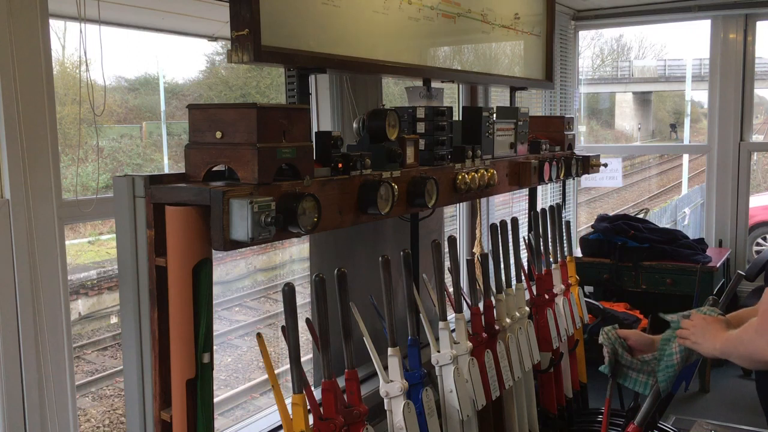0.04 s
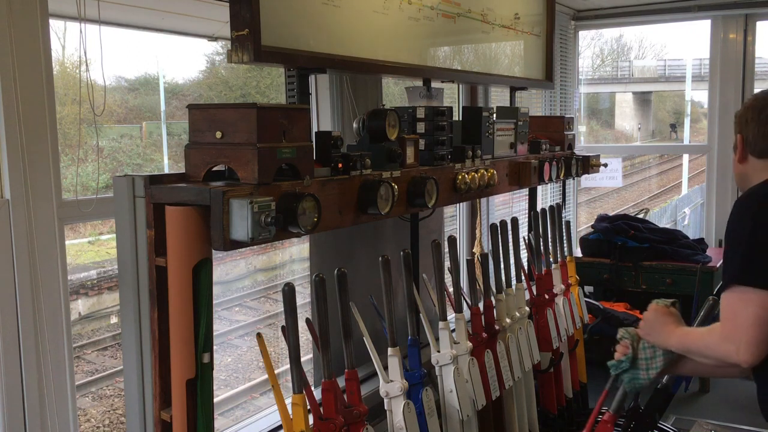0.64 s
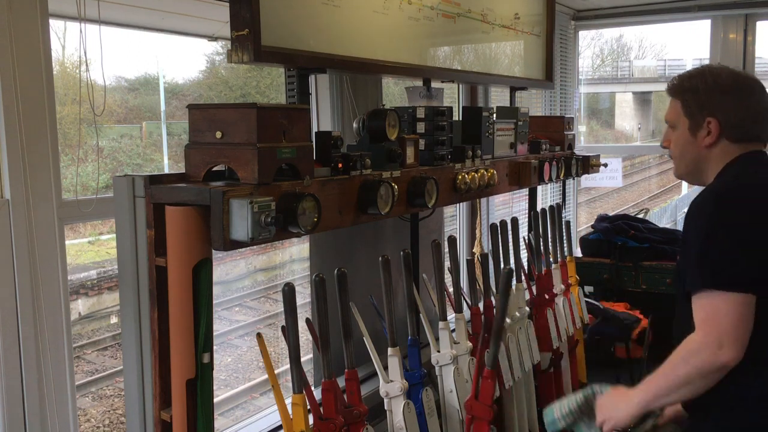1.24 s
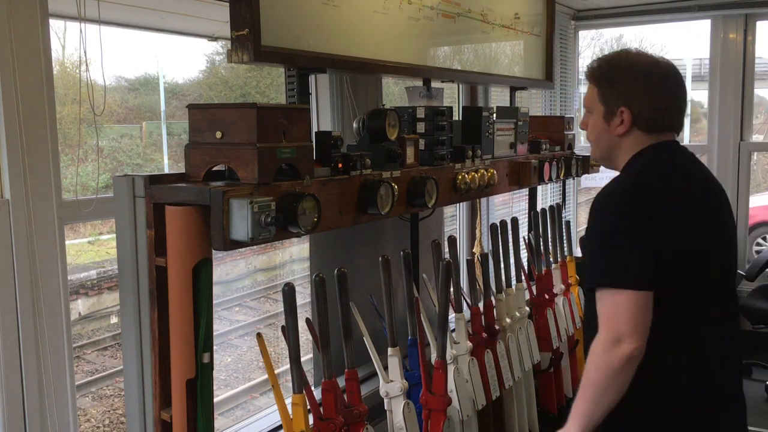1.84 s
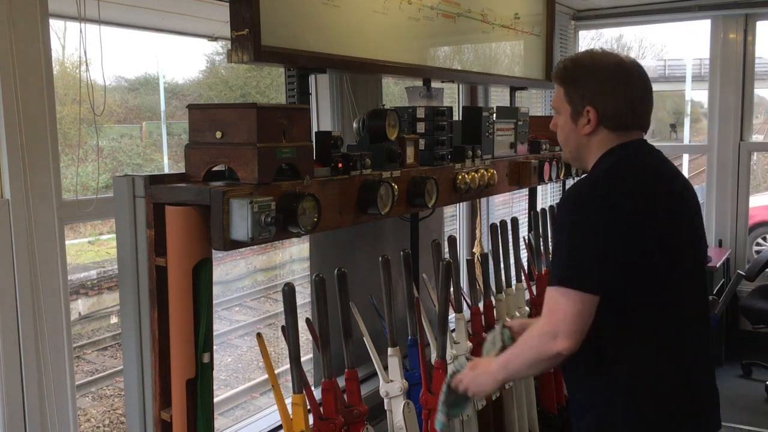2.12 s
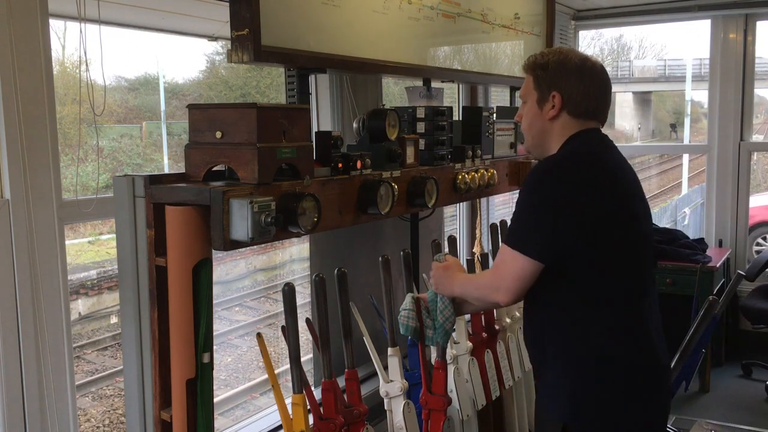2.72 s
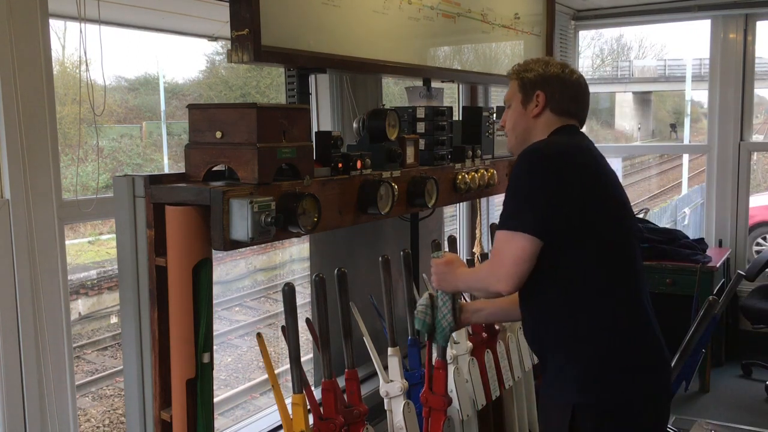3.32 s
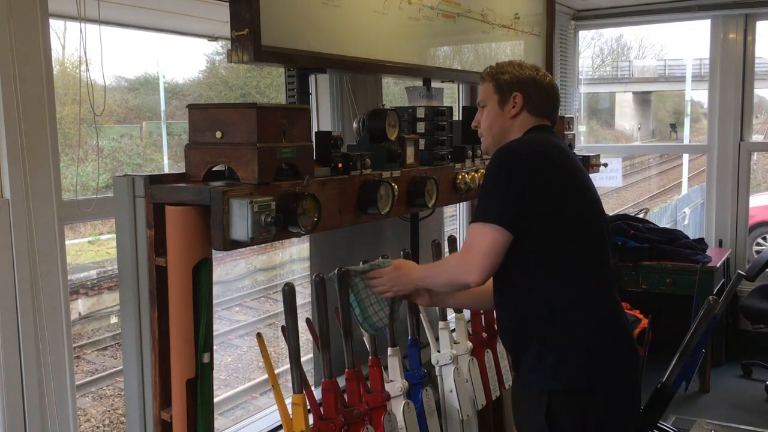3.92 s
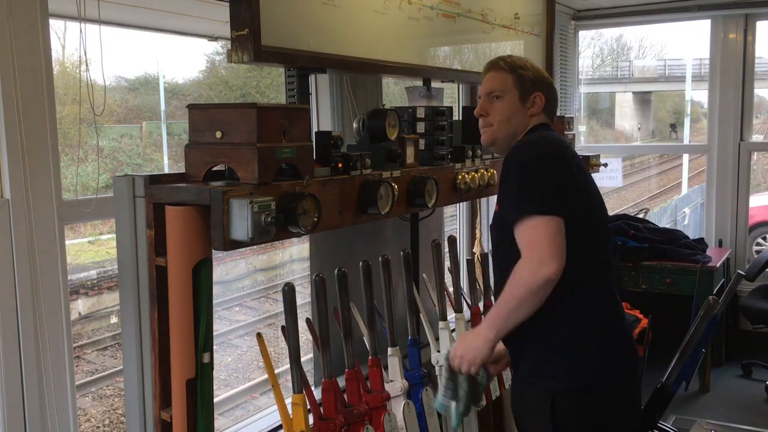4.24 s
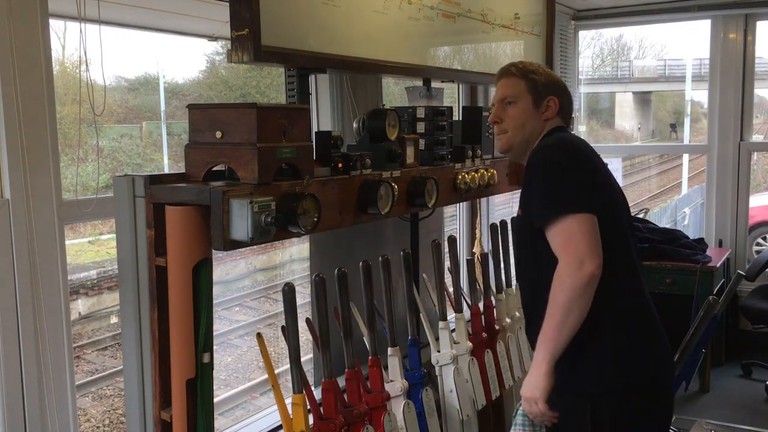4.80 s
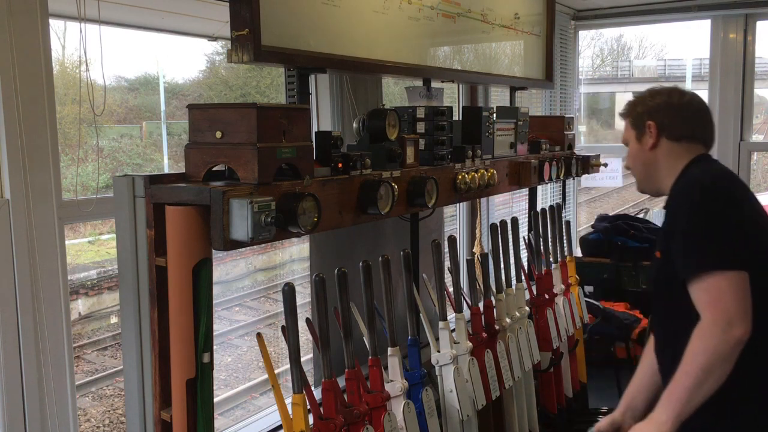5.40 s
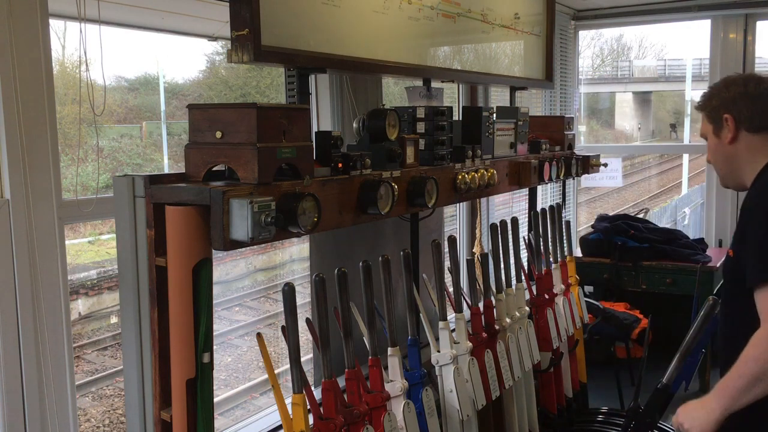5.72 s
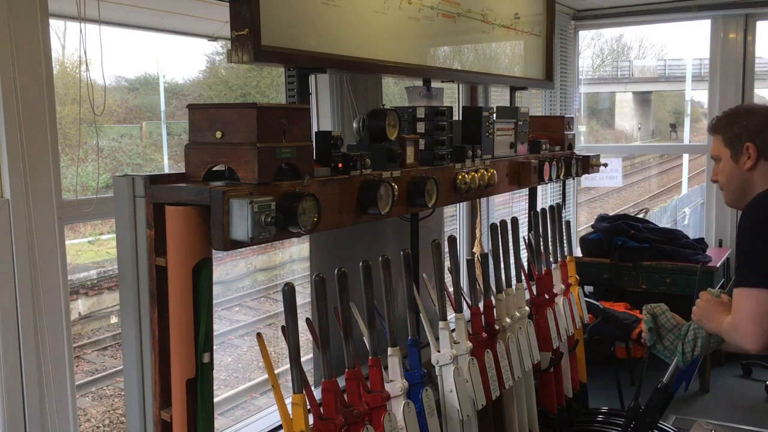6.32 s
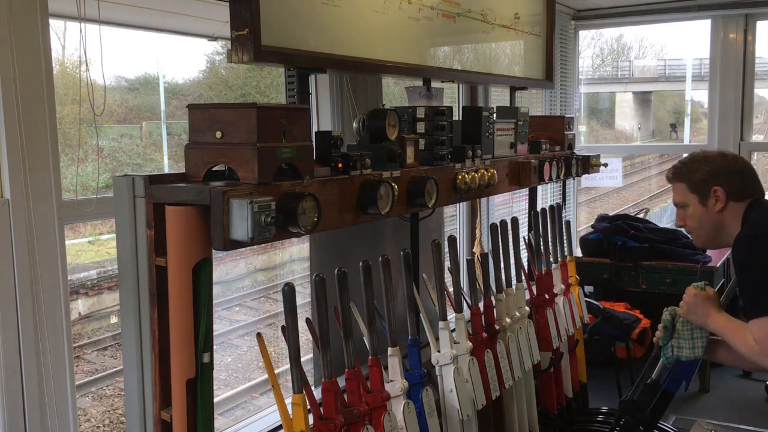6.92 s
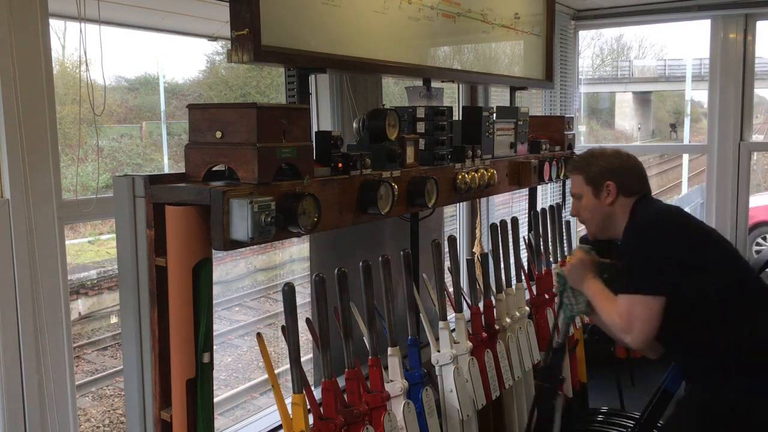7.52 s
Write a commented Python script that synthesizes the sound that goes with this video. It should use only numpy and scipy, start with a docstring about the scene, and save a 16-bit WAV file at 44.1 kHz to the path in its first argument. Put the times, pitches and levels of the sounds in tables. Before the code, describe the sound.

A faint low rumble and hum run throughout inside a small wooden signal box. At about 0.6 seconds an iron catch clanks sharply, followed by a quick run of ringing metal knocks. These grow louder from 1.2 seconds and end near 1.6 seconds as a heavy lever slams into its stop, rebounding and booming through the timber floor. A light clink comes at 2.7 seconds and a soft footstep just after 3. From 3.6 seconds a lever scrapes and rattles along, hitting home at 3.9 with the loudest clunk. A few soft steps thud on the boards around 5.3 to 5.6 seconds. From 6.6 seconds lighter metal clicks and knocks return, leading to a second short scrape at 7.4 and a duller thud right at the end.

```python
"""Over a low, steady rumble, an iron catch handle clanks: a signalman is throwing heavy levers in a
small wooden signal box. Each knock makes the iron frame clatter and the struck part ring. The levers
stick and slip along their quadrant and slam into the stop, where the rodding rebounds and the timber
floor booms. Between the levers he takes a few soft steps on the same boards."""
import sys
import numpy as np
from scipy import signal
from scipy.fft import rfft, irfft
from scipy.io import wavfile
from scipy.ndimage import uniform_filter1d

SR = 44100
rng = np.random.default_rng(int(sys.argv[2]) if len(sys.argv) > 2 else 0)


def dump_mix(stems):
    """Bounce the given channels to the path in sys.argv[1] as a 16-bit WAV at rate SR."""
    frames = np.atleast_2d(stems).T  # one column per channel
    limited = np.clip(frames, -1, 1)  # hard clip at full scale
    pcm = np.round(limited * 32767).astype(np.int16)
    wavfile.write(sys.argv[1], SR, pcm)


N = 332955
AGE = np.arange(3 * 2 ** 14) / SR  # seconds since a hit
SCENE_HZ, HIT_HZ = np.fft.rfftfreq(N, 1 / SR), np.fft.rfftfreq(len(AGE), 1 / SR)


def gain_of(db):
    """Decibels to a gain."""
    return 10 ** (np.asarray(db) / 20)


def unit_rms(x):
    """Scales a signal to an rms of 1."""
    return x / np.sqrt(np.mean(x ** 2) + 1e-20)


def curve_at(points, hz):
    """Reads a curve of (Hz, value) points on a log-frequency axis."""
    f, value = np.transpose(points)
    return np.interp(np.log(hz + 1), np.log(f + 1), value)


def add(mix, start_s, sound):
    """Drops a sound into the mix at its start time."""
    part = mix[max(round(start_s * SR), 0):][:len(sound)]
    part += sound[:len(part)]


# The tone of the background bed. Each row: frequency in Hz, relative level in dB.
RUMBLE_SPECTRUM = [(15, -17.5), (30, -10.5), (42, -9), (58, -0.5), (90, -4), (125, -10.5), (165, -21.5),
                   (280, -28), (400, -34.5), (900, -37.5), (2000, -46.5), (4500, -55.5), (9000, -58.5),
                   (15800, -60.5)]
# The fader ride on its low end. Each row: time in seconds, gain in dB.
RUMBLE_RIDE = [(0, -0.5), (2.201, 2), (2.701, -4), (3.3, -5), (4.8, -2.5), (6.3, -4), (7.5, 2)]


def rumble(db=-46.5, steadiness=0.2):
    """A low rumble, lightly evened out, drifts in level under a faint steady hiss."""
    bed = unit_rms(irfft(rfft(rng.standard_normal(N)) * gain_of(curve_at(RUMBLE_SPECTRUM, SCENE_HZ)), N))
    low = irfft(rfft(bed) / (1 + (SCENE_HZ / 250) ** 4), N)
    hiss = bed - low
    power = uniform_filter1d(uniform_filter1d(low ** 2, size=3000), size=2000) / np.mean(low ** 2)
    drift = gain_of(np.interp(np.arange(N) / SR, *np.transpose(RUMBLE_RIDE)))
    return gain_of(db) * (hiss + low * drift / power ** (steadiness / 2))


def hum(hz=66, db=-56, waver=0.054):
    """A faint low hum whose pitch wanders."""
    wander = unit_rms(irfft(rfft(rng.standard_normal(N)) * (SCENE_HZ < 6), N))
    pitch_hz = hz * (1 + waver * wander)
    return gain_of(db) * unit_rms(np.sin(2 * np.pi * np.cumsum(pitch_hz) / SR))


def minor_modes():
    """The fine peaks and dips, in dB, that a struck part's many small modes put on its sound."""
    ripple = uniform_filter1d(uniform_filter1d(rng.standard_normal(len(HIT_HZ)), size=26), size=18)
    depth_db = curve_at([(400, 0), (1000, 1.6), (2500, 2.4), (6000, 2.2), (12000, 1.6)], HIT_HZ)
    return unit_rms(ripple) * depth_db


def contact_eq(spectrum, lift_db=0):
    """The tone of a contact as a gain per frequency, rippled by minor modes."""
    return unit_rms(gain_of(curve_at(spectrum, HIT_HZ) + lift_db + minor_modes()))


# The resonances of the iron lever frame. Each row: centre in Hz, width in Hz, boost or cut in dB.
FRAME_RESONANCES = [(540, 35, 2.5), (757, 29, -5.5), (938, 12, 9), (1690, 36, 5.5), (2916, 130, -3.5),
                    (4150, 8.3, 5), (6000, 50, 1.5), (7300, 140, 3), (8890, 70, 11), (9720, 110, 11.5),
                    (11100, 90, 6), (11540, 130, 5.5), (12400, 110, 2.5), (13100, 210, 0.5),
                    (14500, 160, 9)]


def frame_eq(spectrum):
    """The tone of a contact heard through the iron frame's resonances."""
    lift_db = sum(db / (1 + (2 * (HIT_HZ - hz) / width) ** 2) for hz, width, db in FRAME_RESONANCES)
    return contact_eq(spectrum, lift_db)


# The tail of frame and room. Each row: frequency in Hz, t60 in seconds before a hit's ring factor.
DECAY_TIMES = [(60, 1), (250, 0.82), (700, 0.61), (2000, 0.61), (5000, 0.49), (9000, 0.44), (15000, 0.48)]


def clatter(eq, ring, grain_db, early, early_s=0.047, treble_db=0, bass_db=0):
    """Countless modes and close walls: a strong start, then a noisy tail whose treble dies first."""
    chatter = unit_rms(uniform_filter1d(rng.standard_normal(len(AGE)), size=50))
    noise = unit_rms(rng.standard_normal(len(AGE)) * gain_of(grain_db * chatter))
    # A harder contact is brighter; the treble tilt grows with frequency.
    tilt_db = treble_db * curve_at([(1000, 0.059), (3500, 0.69), (9000, 1.5), (15000, 3.1)], HIT_HZ)
    tilt_db += bass_db * curve_at([(300, 1), (700, 0.099)], HIT_HZ)
    hz, t, bands = signal.stft(irfft(rfft(noise) * eq * gain_of(tilt_db)), SR, nperseg=512)
    fade = np.exp(-np.log(1000) * t / (ring * curve_at(DECAY_TIMES, hz)[:, None]))
    tail = signal.istft(bands * fade, SR, nperseg=512)[1][:len(AGE)]
    return tail * (1 + early * np.exp(-AGE / early_s))


def ringing(modes):
    """Damped sines, all set off together, from rows of (Hz, dB, t60 in seconds)."""
    return sum(gain_of(db) * np.exp(-np.log(1000) * AGE / t60) * np.sin(2 * np.pi * hz * AGE)
               for hz, db, t60 in modes)


def attack(rise_s):
    """Loose parts take up their slack one after another, so a blow builds over a moment."""
    return np.sin(np.pi / 2 * np.minimum(AGE / rise_s, 1)) ** 2


# The boom of the timber floor that carries the frame.
# Each row: pitch in Hz, relative level in dB, t60 in seconds before a hit's ring factor.
FLOOR_MODES = [(63.6, -20.5, .7), (76.5, 1, 0.65), (112.1, -17.5, 0.52), (130.8, -8.5, 0.36),
               (274, 0.5, 0.2), (318.7, -8, 0.35)]


def thump(eq, treble_db, boom_db, ring, rise_s, boom_rise_s):
    """A blow clatters first; the floor takes longer to start booming."""
    blow = attack(rise_s) * clatter(eq, ring, grain_db=2.5, early=0.9, treble_db=treble_db)
    floor = ringing([(hz, db, t60 * ring) for hz, db, t60 in FLOOR_MODES])
    return blow + gain_of(boom_db) * attack(boom_rise_s) * floor


# The dull tone of a shoe on wood. Each row: frequency in Hz, relative level in dB.
SHOE_SPECTRUM = [(30, -2), (105, 6.5), (180, -5.5), (240, -2.5), (310, 2), (400, -24), (540, -13.5),
                 (750, -20), (1200, -25), (2500, -60), (8000, -60)]
# The footfalls. Each row: start in seconds, level in dB, treble tilt in dB, floor boom in dB.
FOOTFALLS = [(3.153, -41.5, -3.5, -0.5), (4.790, -59, -6, 4), (5.257, -47.5, .5, -8), (5.391, -50, -3, 2),
             (5.430, -47.5, -4.5, 6), (5.510, -49, -7, 1), (5.562, -47.5, 3.5, 7.5),
             (6.366, -51.5, 3, -9.5)]


def footsteps():
    """Soft shoes thud on the same boards that carry the frame."""
    out, eq = np.zeros(N), contact_eq(SHOE_SPECTRUM)
    for start_s, db, treble_db, boom_db in FOOTFALLS:
        thud = thump(eq, treble_db, boom_db, ring=0.58, rise_s=0.0083, boom_rise_s=0.018)
        add(out, start_s, gain_of(db) * thud)
    return out


# A lever sliding on its quadrant, one list a stroke.
# Each row: time in seconds, pressure in dB, treble in dB.
LEVER_STROKES = [
    [(3.60, -47, -10), (3.635, -36.5, -10), (3.68, -34, 2), (3.71, -21.5, -10.5), (3.75, -30, 5.5),
     (3.785, -22, -6), (3.82, -29, -2), (3.865, -21.5, -2), (3.915, -28.5, 8.5)],
    [(7.355, -37.5, -7), (7.38, -35.5, 6.5), (7.405, -24, -3), (7.44, -32.5, 5), (7.47, -28.5, 3.5),
     (7.495, -38.5, 1), (7.55, -43, -3)],
]
# The tone of the scrape, one list a stroke. Each row: frequency in Hz, relative level in dB.
SCRAPE_SPECTRA = [
    [(30, -15.5), (110, 6), (200, -9.5), (300, 3.5), (430, -7), (560, 4.5), (860, 2), (1100, -10.5),
     (1700, -12.5), (2100, -18), (3200, -16), (4800, -24), (6200, -22.5), (15500, -34)],
    [(30, -17), (110, 10), (175, -2.5), (300, 7.5), (520, 1), (900, 4.5), (1400, 0), (2100, -8.5),
     (2600, -11), (3400, -7), (4900, -19), (6400, -17.5), (10000, -31), (15500, -40)],
]


def lever_scrapes(slips_per_s=1200, spread_db=2.0, treble_hz=1800):
    """Iron sticks and slips, ringing the frame; loudness and brightness shift through the stroke."""
    out = np.zeros(N)
    for stroke, spectrum in zip(LEVER_STROKES, SCRAPE_SPECTRA):
        times, pressure_db, treble_db = np.transpose(stroke)
        t = np.arange(times[0], times[-1], 1 / SR)
        slipping = rng.random(len(t)) < slips_per_s / SR
        size = gain_of(spread_db * np.minimum(rng.exponential(1, len(t)), 4))
        slips = unit_rms(slipping * size * rng.choice([-1, 1], len(t)))
        dull = signal.lfilter(*signal.butter(1, treble_hz, fs=SR), slips)
        bright = gain_of(np.interp(t, times, treble_db)) * (slips - dull)
        force = gain_of(np.interp(t, times, pressure_db)) * (dull + bright)
        response = clatter(frame_eq(spectrum), ring=0.34, grain_db=1.5, early=1.2, early_s=0.02)
        add(out, times[0], signal.fftconvolve(force, response / np.linalg.norm(response)))
    return out


# The tone of iron knocking on iron. Each row: frequency in Hz, relative level in dB.
CLANK_SPECTRUM = [(30, -14.5), (90, 3), (200, -0.5), (400, -2.5), (600, -1), (950, -2), (1250, -4),
                  (1650, -7.5), (2200, -13), (2800, -9.5), (4800, -17), (6000, -13), (11000, -23),
                  (15500, -26.5)]
# The voices of the iron parts. Each entry: bass tilt in dB, attack in seconds, ring factor,
# body resonances as (Hz, boost or cut in dB), the part's own notes as (Hz, level in dB).
IRON_PARTS = { "catch": (-10, 0.0079, 0.68, [(500, -9), (1120, -3.5), (1550, 15.5), (3350, 8.5), (4050, 12),
              (6100, 5)], [(1465, -4), (6008, -18.5)]), "block": (-5, .009, 0.85, [(540, 6), (960, -5),
              (2600, 4)], [(548, -7), (1685, -10.5), (5950, -15.5)]),
              "locking bar": (-11.5, .021, 0.74, [(860, 5.5), (1060, -4), (1270, -4.5), (1620, 5),
              (2720, 4), (6100, 2.5)], [(662, -8), (1690, -15.5), (2720, -12), (6170, -18.5), (11020, -18),
              (13130, -20)]), "rod": (-11, 0.014, 0.67, [(620, 6), (850, 6), (1590, 4)], [(4200, -10),
              (7980, -15.5)]), "handle": (0, 0.011, .6, [(870, 3.5), (1700, -7.5), (2660, -1), (4350, 10)],
              [(850, -7), (2650, -10.5), (4320, -16.5), (5200, -20)]),
              "latch": (-8, 0.0014, .65, [(1300, 5), (2480, 2.5), (3000, 8), (4200, 6.5)], [(2450, -10),
              (3060, -13), (5080, -20)]), "spring": (2.4, .009, 0.79, [(1730, 15.5), (3600, 10)],
              [(1690, -3), (2580, -23)]), "lever": (3.5, 0.015, 0.49, [(720, 13.5), (1200, 1.5)],
              [(760, -2.5), (1660, -12.5)]), "frame": (-2, .006, .85, [(255, 12.5), (430, 7.5), (640, 9),
              (1250, 7.5)], [(283, -1.5), (1680, -9)]), "floor plate": (3, 0.0044, 0.69, [(460, 12.5),
              (560, 11.5), (700, 9.5), (1100, 7.5)], [(600, -7), (1085, -17)])}
# The knocks as levers are gripped, unlatched and moved.
# Each row: start in seconds, level in dB, treble tilt in dB, level of the own notes in dB, part.
CLANKS = [ (0.543, -53, -15, -2, "catch"), (0.596, -24.5, 2, -1, "catch"), (.737, -31.5, -9, -4, "block"),
          (.860, -26.5, 1, -3, "block"), (.888, -25.5, 2.5, -0.5, "block"), (.926, -27.5, 3, 1, "block"),
          (0.965, -41, -11, -11, "block"), (1.215, -29, -5.5, -3, "block"),
          (1.223, -20, 4.5, 2, "locking bar"), (1.337, -20, 4.5, -4, "locking bar"),
          (1.401, -23, -4.5, 2.5, "rod"), (1.440, -20, 3, -14, "locking bar"),
          (1.547, -43, 5.5, 16.5, "locking bar"), (1.553, -32, -5, -7, "lever"),
          (1.587, -22.5, -13, -7.5, "frame"), (1.604, -32.5, 4, 6, "locking bar"),
          (2.077, -51.5, -15.5, -14, "latch"), (2.697, -42, -4.5, -9, "handle"),
          (2.730, -37.5, -5.5, 3.5, "handle"), (3.480, -41, -4.5, -5, "latch"),
          (3.604, -41.5, -7, 3.5, "floor plate"), (3.651, -37, -8, 4.5, "handle"),
          (3.694, -29.5, -0.5, -8, "lever"), (3.782, -31, 1.5, 8, "lever"),
          (3.915, -24, -4.5, 2.5, "latch"), (3.922, -27, -5, 7, "frame"),
          (5.390, -47.5, -26.5, -4, "floor plate"), (5.708, -56, -11, -6, "lever"),
          (6.363, -56, -27.5, 1.5, "floor plate"), (6.520, -59, -7, 4, "floor plate"),
          (6.603, -47, -10.5, -7, "spring"), (6.629, -39, -2.5, -0.5, "latch"),
          (6.717, -35, -14.5, -11, "lever"), (6.777, -42, -27, -12, "spring"), (6.832, -38, -9, -7, "rod"),
          (7.000, -41.5, -26.5, -18, "spring"), (7.135, -41.5, -11, 2, "spring"),
          (7.162, -40.5, -10.5, -15, "handle"), (7.338, -40.5, -9, 5.5, "spring"),
          (7.379, -33, -38, 12, "spring"), (7.418, -33.5, -6.5, 9.5, "lever")]


def iron_clanks(beat_hz=30, twin_db=-5, body_width=0.12, cut_s=1.489, cut_fall_s=0.011, cut_db=-22):
    """Each knock makes the frame clatter, coloured by the struck part, which rings in beating pairs."""
    out, frame = np.zeros(N), frame_eq(CLANK_SPECTRUM)
    for start_s, db, treble_db, notes_db, part in CLANKS:
        bass_db, rise_s, ring, resonances, notes = IRON_PARTS[part]
        modes = [(hz, level, ring * curve_at(DECAY_TIMES, hz)) for hz, level in notes]
        tones = ringing([(hz, level, 0.7 * t60) for hz, level, t60 in modes])
        twins = ringing([(hz + beat_hz, level + twin_db, 0.4 * t60) for hz, level, t60 in modes])
        body_db = sum(lift / (1 + (2 * (HIT_HZ / hz - 1) / body_width) ** 2) for hz, lift in resonances)
        eq = unit_rms(frame * gain_of(body_db + minor_modes()))
        body = clatter(eq, ring, grain_db=0, early=0.12, treble_db=treble_db, bass_db=bass_db)
        clank = attack(rise_s) * (body + gain_of(notes_db) * (tones + twins))
        # The sound of the earlier knocks cuts out abruptly at cut_s.
        cut = (start_s < cut_s) * np.clip((start_s + AGE - cut_s) / cut_fall_s, 0, 1)
        add(out, start_s, gain_of(db + cut_db * cut) * clank)
    return out


# The heavy tone of a lever on its stop. Each row: frequency in Hz, relative level in dB.
STOP_SPECTRUM = [(25, -4), (70, 13), (130, 1), (200, -1.5), (280, -1.5), (430, -9.5), (620, -2.5),
                 (1150, -9.5), (1700, -14), (2100, -20.5), (3100, -16.5), (4500, -25.5), (9000, -27),
                 (15500, -36.5)]
# A lever taking up its load or meeting its stop, or a late rebound of the slam before it. Each row: start in
# seconds, # level in dB, treble tilt in dB, floor boom in dB, ring factor, gap to the first rebound in seconds,
# loss per rebound in dB.
LEVER_SLAMS = [ (1.470, -39.5, -15, -1.5, 1.16, 0.034, 0), (1.582, -23.5, -1.5, 2.5, 1.28, .043, 5),
               (1.975, -51, -24, 8, 1.2, .03, 5.5), (3.500, -42, -18, 3.5, 0.65, .05, 5.5),
               (3.627, -35, -10, 5.5, 1.5, .045, 8.5), (3.913, -17, -1.5, 4, 0.96, .0185, 9),
               (6.632, -35.5, -10, -8.5, 1.26, .068, 5), (7.478, -36, -6, 5, 1.4, .02, 17)]


def lever_slams(rebounds=3, rise_s=0.011, softening=1.3, dulling_db=3.5, gap_growth=1.65):
    """A lever hits home and its rodding rebounds, each time later, duller and with a softer attack."""
    out, eq = np.zeros(N), frame_eq(STOP_SPECTRUM)
    for start_s, db, treble_db, boom_db, ring, gap_s, loss_db in LEVER_SLAMS:
        for k in range(1 + rebounds):
            blow = thump(eq, treble_db - k * dulling_db, boom_db, ring,
                         rise_s=rise_s * softening ** k, boom_rise_s=0.016)
            add(out, start_s, gain_of(db - k * loss_db) * blow)
            start_s += gap_s * gap_growth ** k
    return out


def scene():
    """Rumble, footsteps and levers in one small room, in mono."""
    return (rumble() + hum() + footsteps() + lever_scrapes() + iron_clanks() + lever_slams())[None]


def record(dry):
    """A steep low-pass takes off the very top of the treble."""
    low_pass = signal.firwin(511, cutoff=15900, window=("kaiser", 9), fs=SR)
    return signal.oaconvolve(dry, low_pass[None], "same")


dry = scene()
out = record(dry)
dump_mix(out)
```